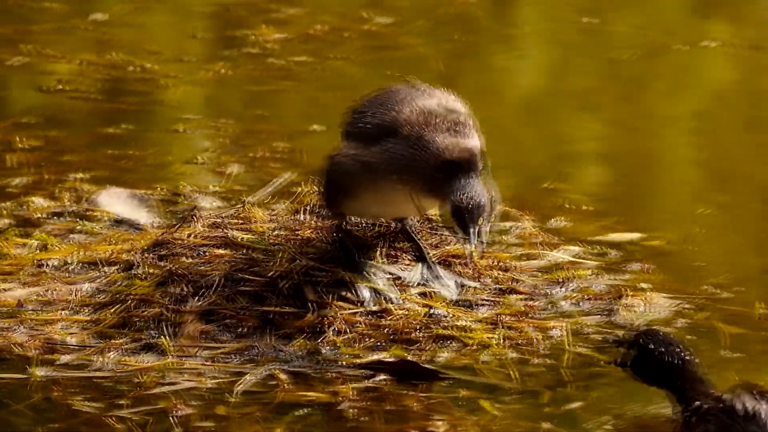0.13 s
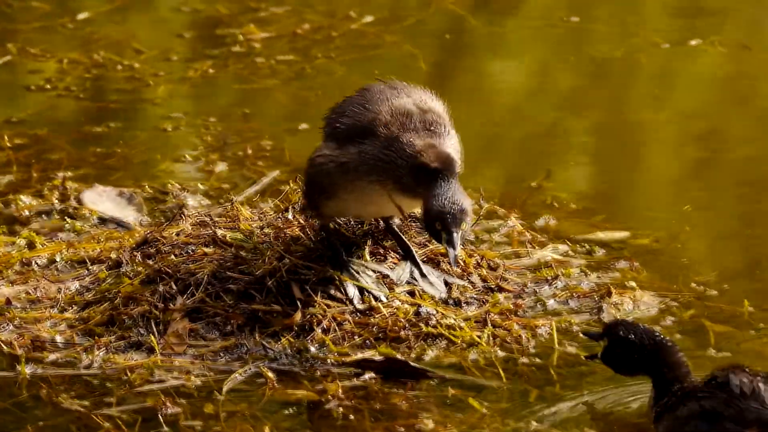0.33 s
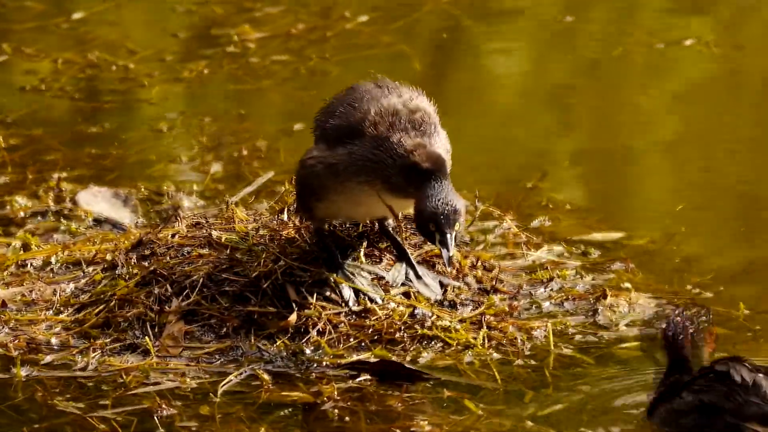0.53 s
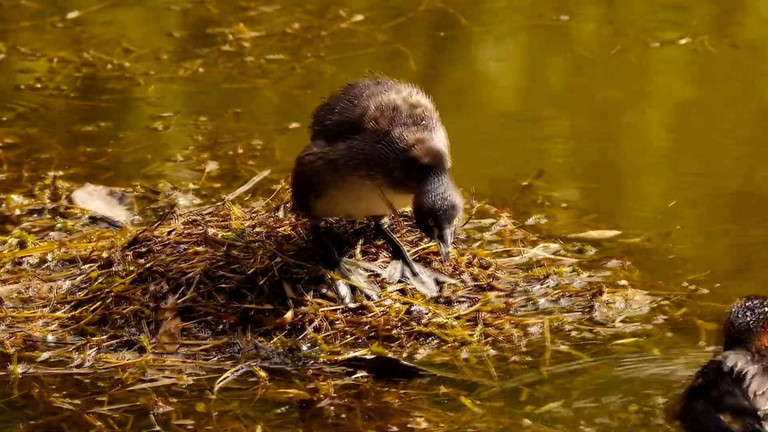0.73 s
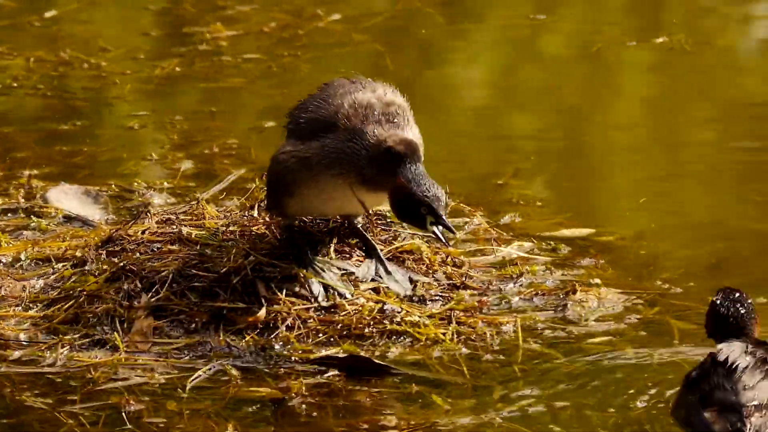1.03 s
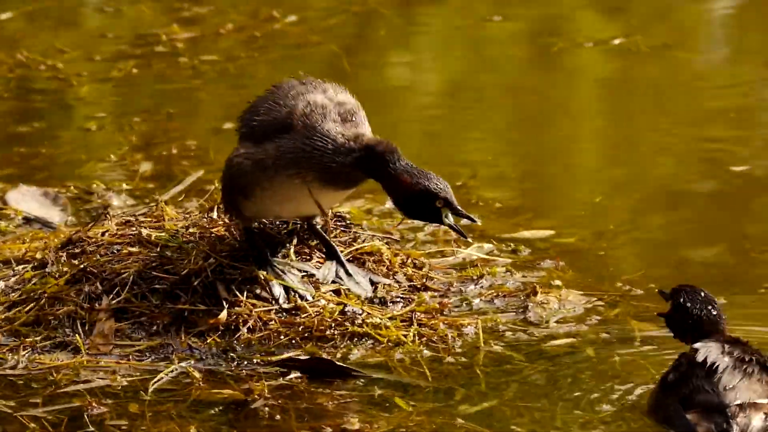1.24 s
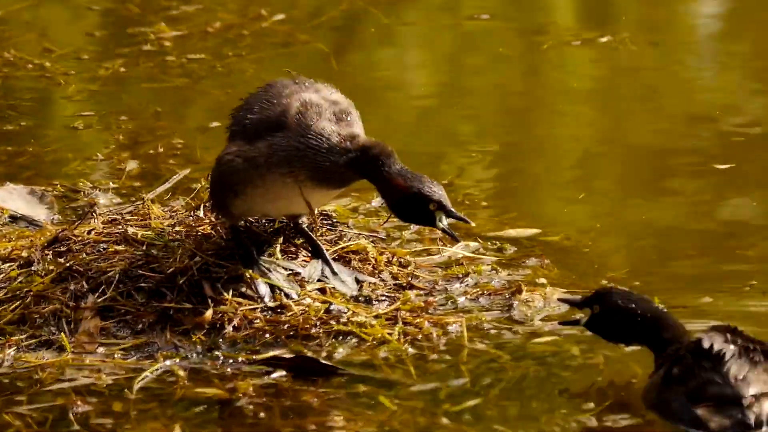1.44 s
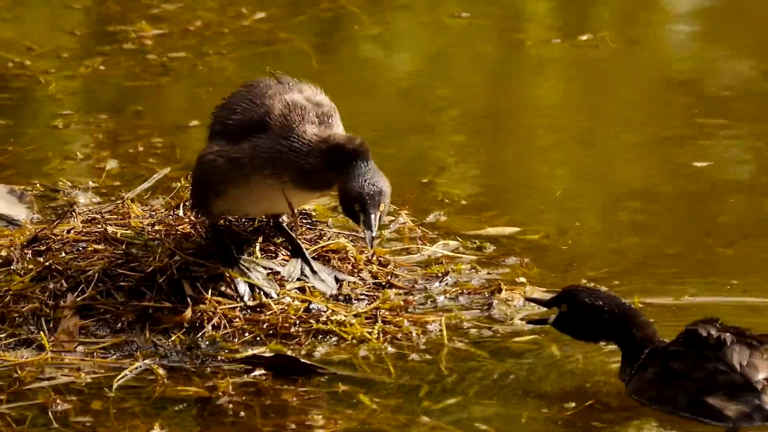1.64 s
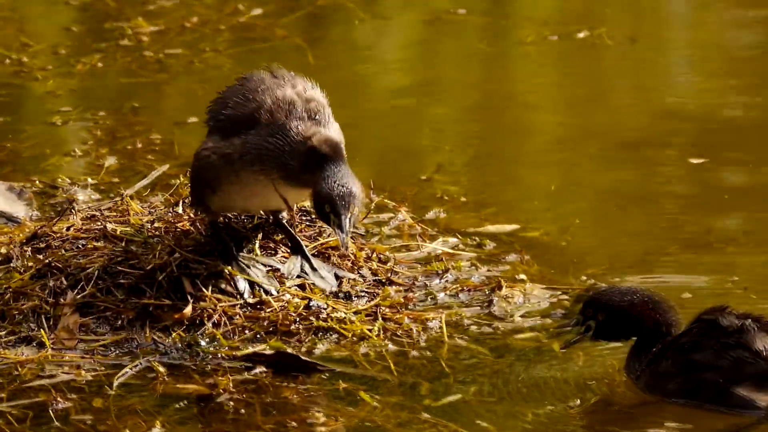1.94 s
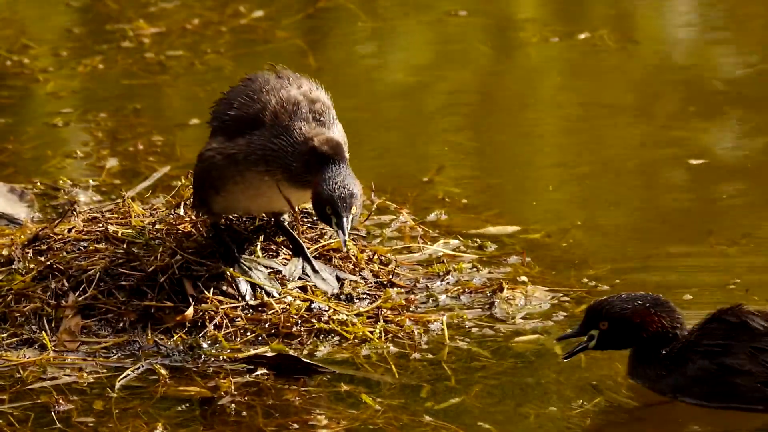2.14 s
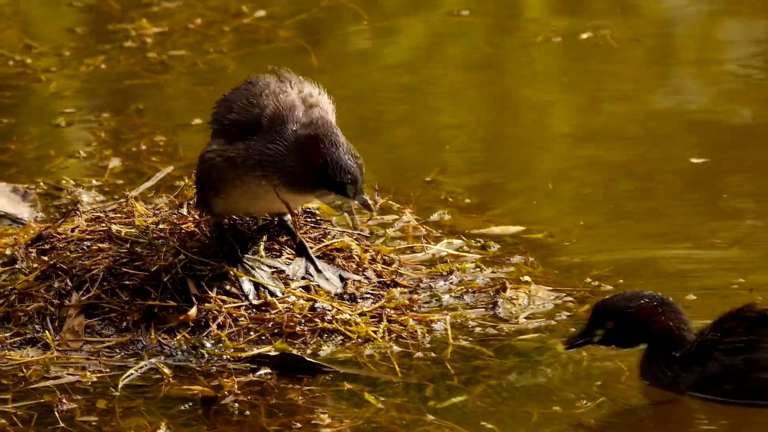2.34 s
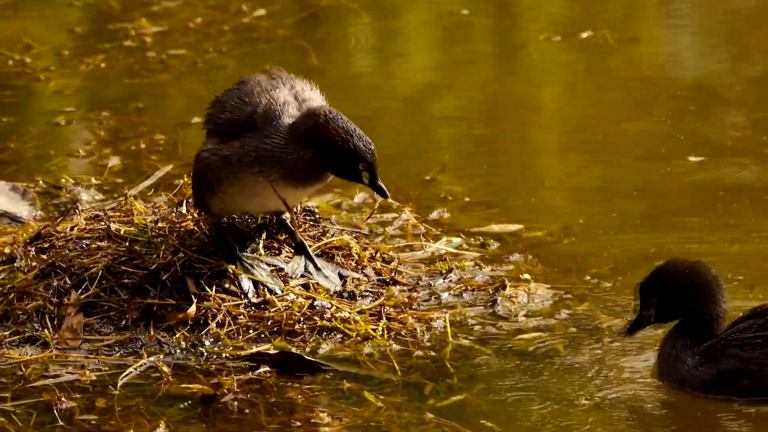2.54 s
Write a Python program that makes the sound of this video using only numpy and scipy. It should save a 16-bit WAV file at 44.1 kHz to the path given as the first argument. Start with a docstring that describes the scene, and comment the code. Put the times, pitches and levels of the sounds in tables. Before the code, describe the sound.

Two grebes give a continuous, rapid, fluttery trill, low and high notes alternating, while a third bird to the left adds brief rising chirps about every half second; light outdoor echo and faint distant hum.

```python
"""Two grebes duet on a pond: their trills interlock, a low and a high note in turn, 16 a second each.
Each note is a whistle fluttered by a second, slower membrane and shaped by the throat.
A third bird to the left gives rising chirps, built from a gliding tone and its overtones.
Reeds and banks echo the birds as fading scattered noise, over a distant broad hum of shaped noise."""
import sys
import numpy as np
from scipy import signal
from scipy.fft import rfft, irfft
from scipy.io import wavfile
from scipy.ndimage import uniform_filter1d

SR = 44100
rng = np.random.default_rng(int(sys.argv[2]) if len(sys.argv) > 2 else 0)


def linear_from_db(decibels):
    """Turn decibels (scalar or array-like) into linear amplitude factors; 0 gives 1."""
    return 10 ** (np.asarray(decibels, float) / 20)


def dump(signal):
    """Clip the signal to [-1, 1] and save it as 16-bit WAV at the path in sys.argv[1]."""
    limited = np.clip(np.atleast_2d(signal).T, -1, 1)
    pcm = np.round(limited * 32767).astype(np.int16)
    wavfile.write(sys.argv[1], SR, pcm)


N = 117747  # length in samples


def table(points, hz):
    """Read (Hz, value) points on a log-frequency axis."""
    p = np.array(points, float)
    return np.interp(np.log(np.maximum(hz, 1)), np.log(p[:, 0]), p[:, 1])


def unit(x):
    """Scale to rms 1."""
    return x / np.sqrt(np.mean(np.abs(x) ** 2))


def smooth(x, k):
    """Average over k samples, twice, along the last axis."""
    return uniform_filter1d(uniform_filter1d(x, k), k)


def walk(rate, n=N):
    """Smooth random wander of rms 1; a higher rate (Hz) wanders faster."""
    return unit(smooth(rng.standard_normal(n), max(int(SR / rate), 1)))


def resonance(hz, centre_hz, width_hz):
    """Gain of a steep resonance over a faint skirt."""
    d = (hz - centre_hz) / width_hz
    skirt = linear_from_db(-20.5) / (1 + (d / 4) ** 2)
    return np.exp(-d ** 2 / 4) + skirt


def pan(x, db):
    """Make the left louder than the right by db."""
    return x * linear_from_db(np.array([[db / 2], [-db / 2]]))


def hum():
    """Smooth distant noise with a shaped spectrum; the bass is nearly the same left and right."""
    # colour of the hum: f/Hz, relative level/dB
    colour = [(20, -29), (70, -17.5), (100, -13), (170, -6.5), (500, -6), (620, 0.5), (1300, -1),
              (2000, -4.5), (3000, -10), (5000, -16.5), (7000, -23), (10000, -29), (13000, -41),
              (16000, -46.5)]
    # difference between the ears, against the shared part: f/Hz, level/dB
    side_level = [(20, -45), (60, -27), (110, -28), (250, -14.5), (700, -10), (2400, -10.5), (5000, -7),
                  (15000, -12.5)]
    # left over right: f/Hz, level/dB
    balance = [(60, 0.044), (200, 0), (500, 1.98), (1300, 2.13), (4400, 1.07), (15000, .5)]
    # slow change of the band around 720 Hz: t/s, level/dB
    band_level = [(0, 2), (.3, 1.5), (.5, 0), (1.5, 0.5), (2.67, -2)]
    hz = np.fft.rfftfreq(N, 1 / SR)
    mid, side = rfft(rng.standard_normal((2, N))) * linear_from_db(table(colour, hz))
    both = mid + side * linear_from_db(table(side_level, hz)) * np.array([[1], [-1]])
    both = both * linear_from_db(table(balance, hz) * np.array([[0.5], [-0.5]]))
    band = np.exp(-(np.log(np.maximum(hz, 1) / 720) / 0.334) ** 4)
    band_gain = linear_from_db(np.interp(np.arange(N) / SR, *np.array(band_level).T))
    noise = irfft(both * (1 - band), N) + band_gain * irfft(both * band, N)
    drift_db = 0.5 * walk(1.35)
    return unit(noise) * linear_from_db(-37.5 + drift_db)


def echo(x):
    """Scattered returns from water, reeds and banks: fading noise, partly different left and right."""
    late_db, late_t60_s = -11.5, 0.383  # T60: time to fade by 60 dB; levels before the treble damping
    early_db, early_t60_s = -12, 0.044
    side_db, damping = -6, 0.097
    t = np.arange(SR // 2) / SR
    noise = rng.standard_normal((2, len(t)))
    mid, side = signal.lfilter([1 - damping], [1, -damping], noise)
    decay = 0
    for db, t60 in ((late_db, late_t60_s), (early_db, early_t60_s)):
        # the square root makes the energy of the fade independent of its length
        decay = decay + linear_from_db(db) * linear_from_db(-60 * t / t60) * np.sqrt(2 * np.log(1000) / t60 / SR)
    onset = np.clip(t / 0.00352, 0, 1)
    returns = decay * onset * (mid + linear_from_db(side_db) * side * np.array([[1], [-1]]))
    return signal.fftconvolve(x.mean(axis=0)[None], returns, axes=1)[:, :N]


def chirps():
    """A tone with overtones glides up, then jumps to a closing high note, a little different each time."""
    # chirps: start t/s, level/dB, stretch of the shape in time, pitch factor,
    # extra level of the closing high note/dB
    calls = [(0.1893, -33, 0.97, 1.0, -6.5), (.723, -32, 1.128, 0.989, -20.5), (1.279, -32, 1.2, 1.0, -5),
             (1.889, -32, 1.068, 1.0, -3), (2.465, -31.5, 0.984, 0.988, 1.5)]
    # shape before stretch and pitch factor: t/s from the start, pitch f/Hz, level/dB
    shape = np.array([(0, 2200, -16.5), (.012, 2410, -11.5), (.024, 2725, -5.5), (.036, 3051, -9),
                      (.05, 3440, -3.5), (.055, 3750, 2.5), (.059, 4377, 4), (.063, 4370, -5),
                      (.069, 4360, -1), (0.075, 4342, -25.5)], float)
    # overtones, the fundamental first: level/dB
    overtones_db = [0, -1.5, -7, -8.5, -11, -18.5]
    # what the chirping throat passes: f/Hz, level/dB
    throat = [(2000, -3), (3800, 1), (4500, -0.5), (6000, 1), (6900, -8), (7700, -12.5), (8700, -15.5),
              (10500, -17.5), (13000, -12.5), (16000, -26.5), (22000, -40)]
    jump_s, flutter_db = 0.0596, 2  # jump: start of the closing note, before the stretch
    closing_overtones_db = -16  # for each two steps up the overtones
    t, out = np.arange(N) / SR, np.zeros(N)
    for start_s, db, stretch, factor, closing_db in calls:
        a, b = int(start_s * SR), int((start_s + stretch * shape[-1, 0]) * SR)
        u = (t[a:b] - start_s) / stretch
        hz = factor * np.interp(u, shape[:, 0], shape[:, 1])
        wobble = 1 + 0.0062 * walk(590.3, SR // 8)[:b - a]
        turns = np.cumsum(hz * wobble) / SR
        level = db + np.interp(u, shape[:, 0], shape[:, 2])
        level = level + closing_db * np.clip((u - jump_s) / 0.0031, 0, 1)
        fade = signal.windows.tukey(b - a, 0.1)
        for k, over_db in enumerate(overtones_db, 1):
            closing = (k - 1) * closing_overtones_db * (u > jump_s) / 2
            flicker = np.sqrt(k) * flutter_db * walk(385, SR // 8)[:b - a]
            gain = linear_from_db(level + over_db + closing + table(throat, k * hz) + flicker)
            audible = k * hz < SR / 2
            out[a:b] += np.sqrt(2) * gain * audible * np.sin(2 * np.pi * k * turns) * fade
    return pan(out, 10)


def trill(notes, voice, sides):
    """Each note: lines at whistle + k * flutter, weighted by a throat that bends at both ends of the note."""
    # what neck and bill pass of the trill: f/Hz, level/dB
    neck = [(1800, -6.5), (2400, -0.5), (3000, -8.5), (3500, 2), (4700, -0.5), (5400, 2.5), (6000, 0.5),
            (6600, 0), (7500, 0), (10000, 0), (11500, -13.5), (16000, -4.5)]
    throat_wander_hz, pitch_follows_throat = 248.5, 0.1203
    half_rate, spread_turns = 0.507, 0.1315
    echo_drag_s = 0.0009  # a note's echo pulls its heard centre this much later
    attack, hold, release, rise0, rise1, jitter, noise_db, pan_db, octave_db, twelfth_db = voice
    margin = 2000  # spare samples at either end
    out, sides = np.zeros(N + 2 * margin), np.array(sides, float)
    n = 1600  # samples worked out for each note
    t = np.arange(n) / SR
    length = attack + hold + release
    fade_in = np.sin(np.pi / 2 * np.clip(t / attack, 0, 1)) ** 2
    fade_out = np.sin(np.pi / 2 * np.clip((length - t) / release, 0, 1)) ** 2
    env = fade_in * fade_out
    centre_s = np.sum(t * env ** 2) / np.sum(env ** 2)
    u = np.clip(2 * t / length - 1, -1, 1)  # -1 at the start, 0 midway, 1 at the end
    bend = u ** 2 * np.where(u < 0, rise0, rise1)
    mean_bend = np.mean(bend * env) / np.mean(env)
    k = np.arange(-8, 36)[:, None] / 2  # line numbers in half steps, for the half-rate flutter
    whole = k % 1 == 0
    for s, db, whistle_hz, flutter_hz, throat_hz, width_hz, half in notes:
        whistle_path = whistle_hz * (1 + jitter * walk(313, n)) + pitch_follows_throat * bend
        whistle = np.cumsum(whistle_path) / SR + rng.random()
        flutter_path = flutter_hz * (1 + 2 * jitter * walk(390, n))
        flutter = np.cumsum(flutter_path) / SR + rng.random()

        hz = whistle_hz + k * flutter_hz
        chest_db, beak_db = (np.interp(s, sides[:, 0], sides[:, c]) for c in (1, 2))
        throat_path = throat_hz + throat_wander_hz * walk(149.4, n) + bend - mean_bend
        throat = resonance(hz, throat_path, 0.774 * width_hz)
        chest = linear_from_db(chest_db + 6.5) * resonance(hz, 2389, 275)
        beak = linear_from_db(beak_db - 2) * env * resonance(hz, 8990, 930)
        top = linear_from_db(beak_db - 15.5) * resonance(hz, 14600, 1000)
        gain = (throat + chest + beak + top) * linear_from_db(table(neck, hz))
        gain = gain * np.where(whole, 1, half_rate * np.sqrt(np.clip(half, 0, 1)))

        # half-rate lines and those far from the whistle are not locked to it
        turns = rng.standard_normal(k.shape) * np.where(whole & (abs(k) < 4), spread_turns, 1)
        breath = smooth(rng.standard_normal((len(k), n)), 30) * np.sqrt(45)  # back to about rms 1
        rough = 1 + linear_from_db(noise_db) * breath
        lines = gain * rough * np.exp(2j * np.pi * (whistle + k * flutter + turns))
        z = env * np.sum(lines, axis=0)
        z /= np.abs(z).max()
        # the membrane is not linear: powers of the tone add the octave and the twelfth
        note = np.real(z + linear_from_db(octave_db) * z ** 2 + linear_from_db(twelfth_db) * z ** 3)
        note *= linear_from_db(db) / np.sqrt(np.sum(note ** 2) / (0.01228 * SR))  # energy as if spread over 12.28 ms
        i = int((s - echo_drag_s - centre_s) * SR) + margin
        out[i:i + n] += note
    return pan(out[margin:N + margin], pan_db)


def low_bird():
    """The lower voice of the duet: short fluttered whistles whose throat sinks and rises again."""
    # notes: heard centre t/s, level/dB, whistle f/Hz, flutter f/Hz, throat f/Hz,
    # throat width/Hz before trill() narrows it, half-rate flutter share before its root and scaling
    notes = [(0.0269, -25.5, 4152, 729, 4282, 274, 0.028), (0.0859, -26.5, 4220, 690.3, 4365, 502, 0.102),
             (0.1434, -23, 4107, 728, 4212, 243, 0.02), (0.2038, -22, 4136, 553.6, 4346, 254, 0.04),
             (0.2612, -24.5, 4177, 585.6, 4410, 477, 0.078), (0.3188, -22, 4179, 709.4, 4300, 404, 0.07),
             (0.3772, -22, 4268, 684.5, 4280, 490, 0.041), (0.4339, -23, 4192, 710.3, 4230, 484, 0.037),
             (0.4986, -23, 4096, 551.5, 4116, 600, 0.1), (0.5563, -21.5, 4233, 573.7, 4367, 612, 0.06),
             (0.6198, -23, 4813, 589, 4813, 448, 0.097), (0.6758, -27, 4303, 543, 4423, 621, 0.29),
             (0.7382, -26.5, 4754, 553.7, 4565, 488, 0.58), (0.7953, -26.0, 4680, 653.6, 4520, 560, 0.155),
             (0.8576, -26, 4743, 609.2, 4461, 616.9, 0.25), (0.9192, -26, 4678, 657, 4740, 514, 0.155),
             (0.9806, -27.5, 4294, 643.4, 4456, 568, 0.123), (1.0453, -28.5, 4305, 578.6, 4500, 595, 0.49),
             (1.1072, -28.5, 4901, 543.5, 4760, 500, 0.244), (1.1673, -26.5, 4828, 648.5, 4658, 465, 0.17),
             (1.2315, -28.5, 4772, 539, 4450, 559, 0.11), (1.2917, -27, 4246, 632, 4110, 563, 0.19),
             (1.3527, -26.5, 4147, 541.7, 4183, 524.6, 0.2), (1.417, -29, 4259, 618.3, 4460, 717, 0.22),
             (1.4796, -25, 4675, 587, 4730, 687, 0.1), (1.535, -26.5, 4263, 606.7, 4460, 548, 0.32),
             (1.5964, -24, 4225, 590, 4232, 479, 0.2), (1.6583, -24.5, 4211, 569.4, 4180, 416, 0.226),
             (1.7201, -26.5, 4231, 723.5, 4450, 596, 0.27), (1.7801, -25, 4527, 548.5, 4370, 577, 0.64),
             (1.8394, -25, 4727, 589.4, 4413, 470, 0.51), (1.9046, -25, 4076, 600.6, 4410, 603, 0.2),
             (1.9668, -25.5, 4411, 640, 4496, 564, 0.334), (2.0283, -25, 4714, 622, 4350, 581.5, 0.122),
             (2.0921, -24.5, 4422, 645.4, 4660, 579, 0.81), (2.1529, -24.5, 4329, 676, 4530, 665, 0.01),
             (2.2175, -24.5, 4386, 647.7, 4594, 560, 0.67), (2.2851, -26.5, 4315, 637.2, 4555, 614, 0.19)]
    # voice: attack/s, hold/s (negative: the fades overlap), release/s, throat rise at start/Hz,
    # at end/Hz, whistle jitter share, breath noise/dB, left over right/dB, octave/dB, twelfth/dB
    voice = (0.0242, -0.007, 0.01, 1199, 1500, 0.0168, -6.5, 0.39, -21, -32)
    # side resonances before the shifts in trill(): t/s, chest level/dB, beak level/dB
    sides = [(0, -25, -32.5), (.4, -25, -25), (.7, -11.5, -27.5), (1.2, -13, -33.5), (1.6, -21, -34.5),
             (1.9, -17, -31.5), (2.3, -18.5, -31)]
    return trill(notes, voice, sides)


def high_bird():
    """The higher voice of the duet, with a slower attack; its throat starts low and rises in each note."""
    # notes: heard centre t/s, level/dB, whistle f/Hz, flutter f/Hz, throat f/Hz,
    # throat width/Hz before trill() narrows it, half-rate flutter share before its root and scaling
    notes = [(0.0045, -34, 5327, 584, 5280, 716, 0.235), (0.0558, -27.5, 5148, 677, 5410, 552, 0.75),
             (0.113, -26.5, 5343, 540, 5725, 436, 0.24), (0.1732, -27, 5865, 575, 5716, 365, 0.094),
             (0.2309, -28, 4954, 689, 5030, 999, 0.29), (0.2911, -26, 5667, 648.5, 5530, 485, 0.19),
             (0.3529, -29, 5420, 577, 5470, 695, 0.33), (0.4115, -29, 5400, 600, 5315, 668, 0.06),
             (0.4702, -29.5, 5570, 568.4, 5430, 693, 0.35), (0.5322, -30.5, 5302, 557, 5060, 933, 0.42),
             (0.5901, -31, 5464, 623, 5440, 407.5, 0.25), (0.6505, -31, 5336, 689.5, 5340, 566, 0.18),
             (0.7094, -31.5, 5409, 634, 5130, 423, 0.17), (0.7681, -31.5, 5300, 620, 5300, 500, 0.26),
             (0.8308, -32.5, 4763, 544.5, 4930, 632, 0.21), (0.8938, -33, 5402, 701, 5162, 628, 0.3),
             (0.9506, -31.5, 5338, 648.4, 5097, 481.5, 0.07), (1.016, -32.5, 5303, 610, 5140, 525, 0.08),
             (1.0761, -31, 5298, 598, 5190, 456, 0.16), (1.1393, -30, 5416, 637, 5340, 351, 0.05),
             (1.1992, -32, 5385, 633, 5050, 506, 0.253), (1.2622, -29.5, 4751, 654, 5095, 469, 0.1),
             (1.3271, -28.5, 5300, 641, 5260, 500, 0.21), (1.3853, -28.5, 5357, 586, 5250, 393.9, 0.05),
             (1.448, -27.5, 5360, 612.4, 5345, 438.6, 0.07), (1.5088, -28.5, 5516, 591.4, 5370, 506, 0.15),
             (1.571, -26.5, 5387, 598, 5373, 422, 0.05), (1.6327, -27, 5333, 565.4, 5430, 560, 0.35),
             (1.692, -28.5, 5423, 703.6, 5230, 470, 0.1), (1.7548, -28.5, 5770, 654, 5640, 436, 0.103),
             (1.8161, -29, 5420, 536, 5370, 535, 0.45), (1.8753, -29, 5287, 539.6, 5670, 466.1, 0.402),
             (1.9369, -30, 5325, 682.7, 5220, 500, 0.122), (2.0017, -30.5, 5358, 614, 5140, 426, 0.16),
             (2.0583, -33, 5231, 545.6, 5200, 496, 0.22), (2.1227, -33.5, 5213, 603.6, 5043, 550, 0.223),
             (2.1856, -38.5, 4814, 642, 5170, 549, 0.07)]
    # voice: attack/s, hold/s, release/s, throat rise at start/Hz, at end/Hz (negative: lower),
    # whistle jitter share, breath noise/dB, left over right/dB, octave/dB, twelfth/dB
    voice = (0.03, 0.05, 0.0678, -700, -400, 0.0688, -4.5, 0.94, -25, -21.5)
    # side resonances before the shifts in trill(): t/s, chest level/dB, beak level/dB
    sides = [(0, -21.5, -23.5), (.3, -23.5, -15.5), (.6, -17.5, -10.5), (.9, -18.5, -10), (1.2, -23.5, -19),
             (1.6, -27, -19.5), (1.8, -23.5, -13.5), (2.2, -24, -18)]
    return trill(notes, voice, sides)


def scene():
    """Birds, their echo and the hum."""
    birds = low_bird() + high_bird() + chirps()
    return birds + echo(birds) + hum()


def roll_off(x):
    """The treble ends steeply here."""
    return signal.sosfilt(signal.butter(12, 15820, fs=SR, output="sos"), x)


def record(dry):
    """Add a small steady offset to the sound and finish the mix."""
    offset = -0.0057  # of full scale
    return roll_off(dry + offset)


dry = scene()
out = record(dry)
dump(out)
```